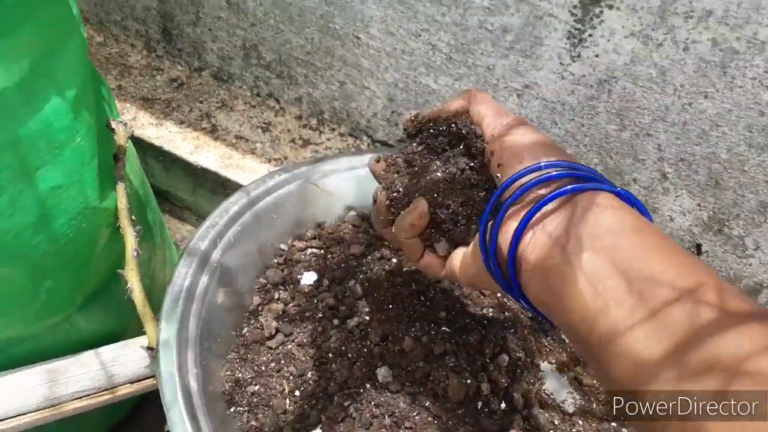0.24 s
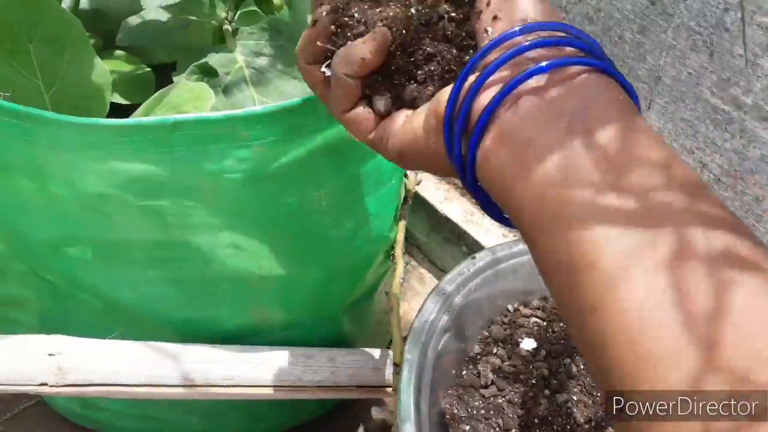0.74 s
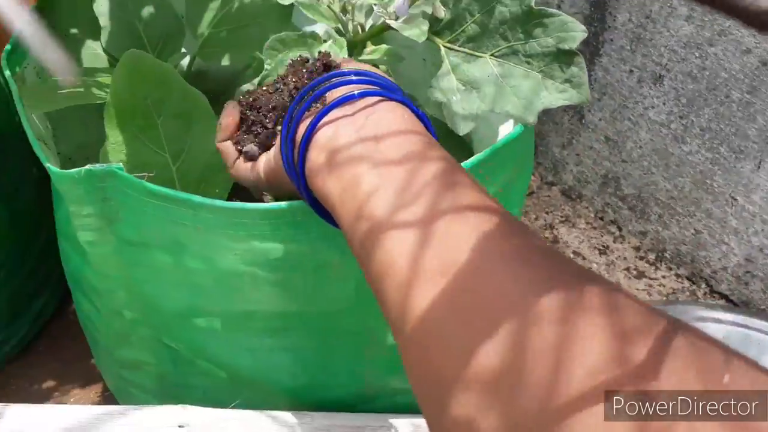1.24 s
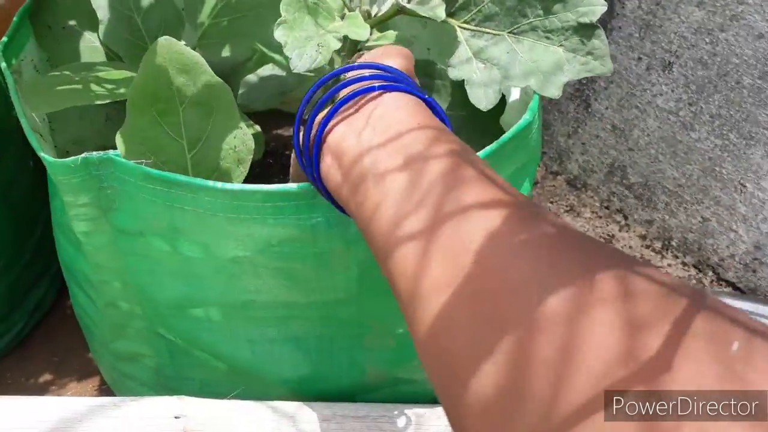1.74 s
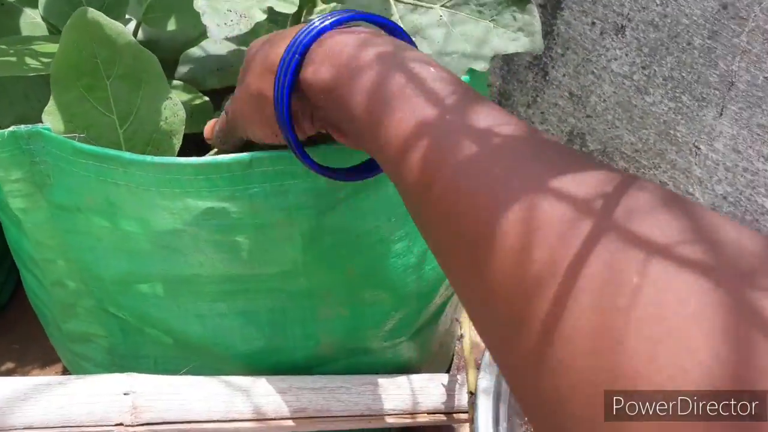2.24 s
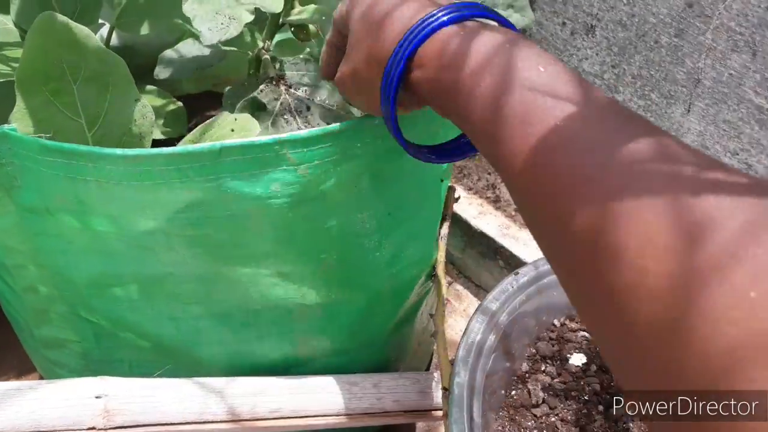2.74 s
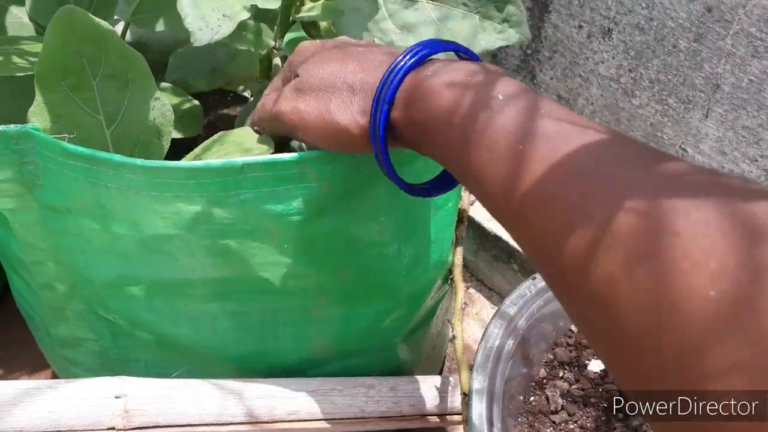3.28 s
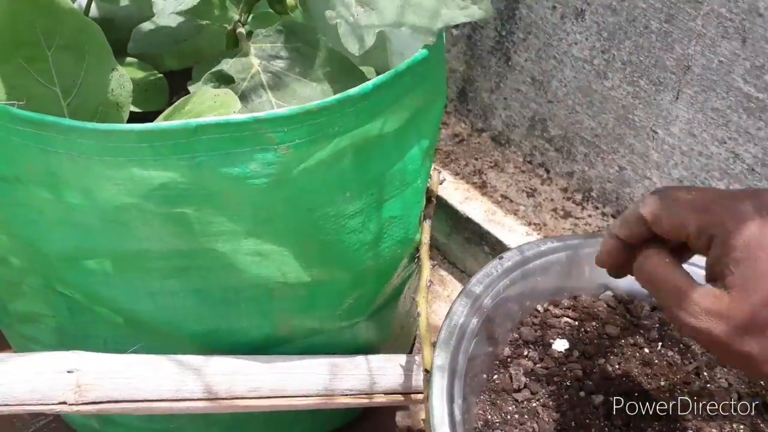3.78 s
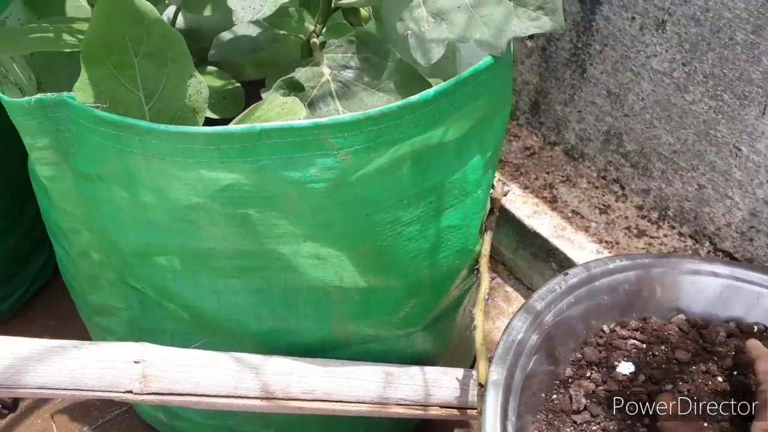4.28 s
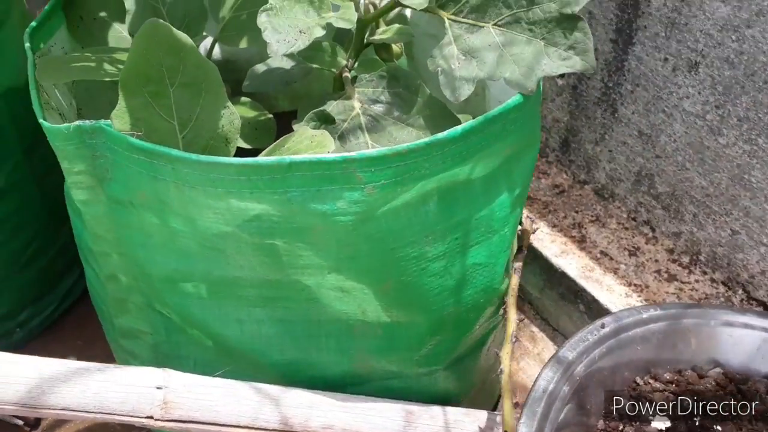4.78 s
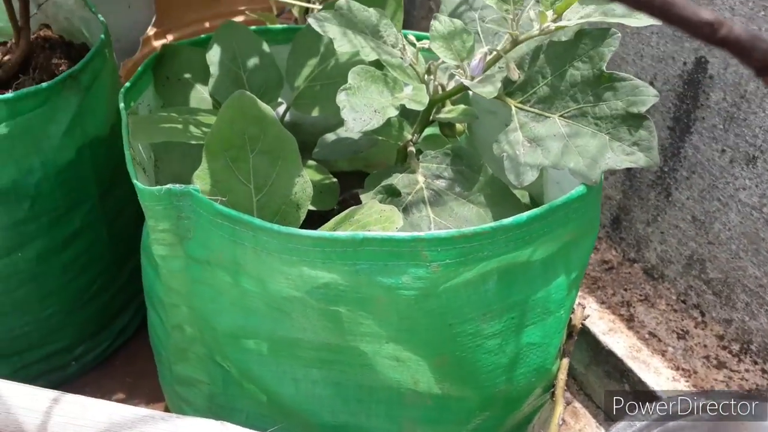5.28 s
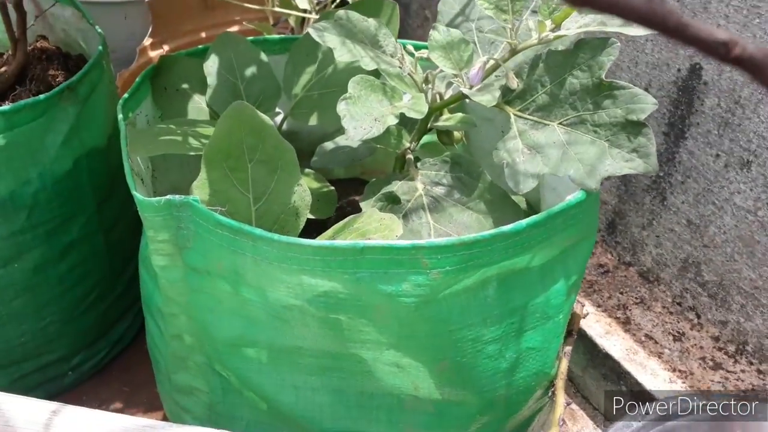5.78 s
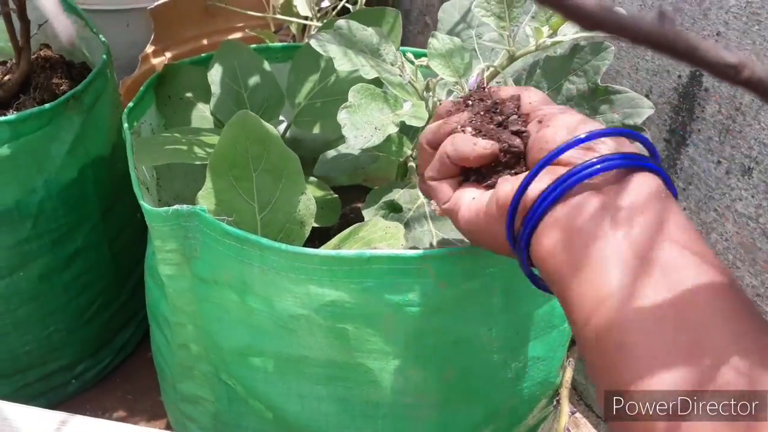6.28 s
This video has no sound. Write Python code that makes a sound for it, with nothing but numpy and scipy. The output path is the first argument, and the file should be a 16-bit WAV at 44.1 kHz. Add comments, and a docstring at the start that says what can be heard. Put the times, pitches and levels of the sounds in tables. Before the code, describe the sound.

Outdoors, very close to a phone microphone, a hand scrapes crumbly soil while a tiny metal trinket tinkles. Leaves and cloth rustle, crumbs crack and glass bangles clink brightly. After a quieter moment, a steel bowl gets one loud, short clank and some soft brushing. Wind then bumps the microphone, with a lighter second knock over faint distant traffic.

```python
"""Bangled hand feeding a potted plant

Outdoors, close to a phone's microphone: a hand in glass bangles carries crumbly fertilizer from a steel bowl to a
woven plant bag. Far traffic and air are shaped noise; near the end gusts buffet the microphone as lumps of low noise.
The bowl, knocked twice and brushed, the bangles and a small metal trinket ring as damped modes.
Nearest are leaves, cloth and soil: patchy noise and tiny clicks, with bursts for cracking crumbs and scrapes.
"""
import sys
import numpy as np
from scipy import signal
from scipy.fft import rfft, irfft, next_fast_len
from scipy.io import wavfile
from scipy.ndimage import uniform_filter1d, map_coordinates

SR = 44100
rng = np.random.default_rng(int(sys.argv[2]) if len(sys.argv) > 2 else 0)


def bounce(signal):
    """Save signal as a 16-bit WAV file at the path given by the first command-line argument."""
    frames = np.transpose(np.atleast_2d(signal))
    limited = np.clip(frames, -1, 1)
    pcm = np.round(limited * 32767).astype(np.int16)
    wavfile.write(sys.argv[1], SR, pcm)


N = 287664  # length in samples
TOP_HZ, NOISE_TOP_HZ = 16800, 15700  # upper limits of the phone, and of the noise-like layers


def amp(db):
    """Decibels to amplitude."""
    return 10 ** (np.asarray(db) / 20)


def unit(x):
    """Scales a sound to rms 1."""
    return x / np.sqrt(np.mean(x ** 2) + 1e-20)


def along(points, hz):
    """Reads (pitch_hz, value) points on a logarithmic pitch axis."""
    f, v = np.transpose(points)
    return np.interp(np.log(hz + 1), np.log(f + 1), v)


def curves(rows):
    """One value per sample for each column after the time."""
    s, *cols = np.transpose(rows)
    return [np.interp(np.arange(N) / SR, s, c) for c in cols]


def wobble(rate):
    """A smooth random curve with rate knots a second."""
    knots = rng.standard_normal(int(N * rate / SR) + 4)
    return map_coordinates(knots, [np.arange(N) * rate / SR])


def filtered(x, response):
    """Multiplies the spectrum of x by a response of frequency."""
    m = next_fast_len(len(x) + 8192)
    return irfft(rfft(x, m) * response(np.fft.rfftfreq(m, 1 / SR)), m)[:len(x)]


def noise(spectrum, patchy_db=0, count=N, size=256):
    """Coloured noise of rms 1, uneven in time and frequency; a larger size makes patches narrower and longer."""
    z = signal.stft(rng.standard_normal(count), nperseg=size)[2]
    field = uniform_filter1d(rng.standard_normal(z.shape), 5, 0)
    field = uniform_filter1d(field, 5, 1)
    white = signal.istft(z * amp(patchy_db * unit(field)), nperseg=size)[1][:count]
    return unit(filtered(white, lambda hz: amp(along(spectrum, hz))))


def add(track, s, sound):
    """Mixes a sound into the track from time s."""
    room = track[round(s * SR):][:len(sound)]
    room += sound[:len(room)]


def swell(t60, rise):
    """A quick rise and an exponential fall, top 1; t60 and rise in seconds."""
    t = np.arange(SR // 4) / SR
    shape = (1 - np.exp(-t / max(rise, 1e-4))) * amp(-60 * t / max(t60, .005))
    return shape / shape.max()


# Strength of the far traffic: time_s [s], level_db [dB]
TRAFFIC_LEVEL = [(0.0, -66.5), (1.16, -69), (1.69, -64.5), (3.34, -58), (4.19, -67.5), (5.56, -59),
                 (5.99, -62), (6.25, -60.5), (6.37, -68), (6.52, -64)]
# Colour of the far traffic: pitch_hz [Hz], density_db [relative dB per Hz]
TRAFFIC_COLOUR = [(15, -56), (25, -28.5), (70, -4.5), (98, 3.5), (150, 1), (200, -16.5), (260, -11.5),
                  (340, -28.5), (570, -120)]
# Colour of the faint air noise: pitch_hz [Hz], density_db [relative dB per Hz]
AIR_COLOUR = [(120, -36.5), (200, -6), (321, 1.5), (472, -6.5), (997, -14.5), (1380, -17.5), (2580, -10),
              (8140, -12), (10500, -16), (14900, -16), (15700, -14)]


def outdoors():
    """Low noise of far traffic wavers over a faint, steady, wideband air noise."""
    air = filtered(noise(AIR_COLOUR, patchy_db=1.5), lambda hz: hz < NOISE_TOP_HZ)
    waver_db = 2 * wobble(37)
    traffic = amp(curves(TRAFFIC_LEVEL)[0] + waver_db) * noise(TRAFFIC_COLOUR)
    return traffic + amp(-74.0) * air


# Puffs of wind on the microphone: start_s [s], level_db [dB at the top]
PUFFS = [(5.547, -37), (5.631, -47), (5.709, -63), (5.788, -51), (5.86, -53.5), (5.968, -47.5),
         (6.167, -40.5), (6.292, -38.5), (6.365, -38.5), (6.416, -42.5), (6.493, -41.5)]
# Strength of a soft narrow swish: time_s [s], level_db [dB]
SWISH_LEVEL = [(6.33, -82.5), (6.396, -62.5), (6.52, -55)]


def wind():
    """Each puff is a quickly rising, slowly fading lump of low noise; one swish is narrow-band noise."""
    puffs = np.zeros(N)
    for s, db in PUFFS:
        add(puffs, s, amp(db) * swell(t60=0.12, rise=0.0062))
    started = np.arange(N) > SWISH_LEVEL[0][0] * SR
    swish = amp(curves(SWISH_LEVEL)[0]) * started
    # both colours: Hz, relative dB per Hz
    low = noise([(25, -27.5), (60, 8.5), (150, 3.0), (320, -12), (600, -53.5), (900, -84)])
    narrow = noise([(800, -69), (1150, -11), (1450, 5), (1800, -3.5), (2500, -57.5)])
    return puffs * low + swish * narrow


# Contacts of hand and bowl, several to a knock:
# start_s [s], level_db [dB], bass_db [dB relative to level], tilt_db [dB per octave above 1 kHz]
KNOCKS = [(4.722, -17.5, -10, 0), (4.728, -1, -25, -12), (4.7319, -3, -32, 10), (4.7462, -21, -12, -7),
          (6.074, -8.5, -66.5, 2), (6.078, -12.5, -58.5, -5)]
# Modes of the steel bowl: pitch_hz [Hz], level_db [relative dB], t60_s [s when left to ring after a knock]
BOWL_MODES = [(429, -14, 0.11), (871, -7.5, 0.094), (1044, -11, 0.12), (1878, -11, 0.089), (2300, -3, 0.12),
              (2664, -3.5, 0.11), (2940, 1, 0.1), (3960, 2.5, 0.09), (4540, -11.5, 0.043)]
# Colour of the knock's clatter: pitch_hz [Hz], density_db [relative dB per Hz]
CLATTER_COLOUR = [(290, -35), (500, -32), (1010, -14.5), (1820, -17.5), (2840, 0.5), (4500, 1), (5050, 2.5),
                  (8600, -8.5), (15500, -45.5)]
# Dying of yard and bowl after a knock: pitch_hz [Hz], t60_s [s]
CLATTER_DECAY = [(500, 0.15), (2000, 0.097), (6000, 0.05), (15000, 0.055)]


def knocked_bowl():
    """A knock excites damped steel modes, a clatter of crumbs dying band by band and a low thud."""
    out, t = np.zeros(N), np.arange(SR // 4) / SR
    for s, db, bass_db, tilt in KNOCKS:
        ring = np.zeros(len(t))
        for hz, level, t60 in BOWL_MODES:
            decay = amp(level + rng.normal(0, 3) - 60 * t / t60)
            ring += decay * np.sin(2 * np.pi * hz * t + rng.uniform(0, 2 * np.pi))
        hz, when, z = signal.stft(rng.standard_normal(len(t)), SR, nperseg=128)
        colour_db = along(CLATTER_COLOUR, hz) + tilt * np.log2(np.maximum(hz, 1000) / 1000)
        fall_db = 60 * when / along(CLATTER_DECAY, hz)[:, None]
        z = z * amp(colour_db[:, None] - fall_db)
        clatter = signal.istft(z, SR, nperseg=128)[1][:len(t)]
        clatter = clatter / np.std(clatter[:SR // 200])  # level set by its first 5 ms
        thud = 1.3 * np.sin(2 * np.pi * 150 * t) + 1.3 * np.sin(2 * np.pi * 250 * t)
        thud = amp(bass_db - 60 * t / 0.1) * thud
        onset = 1 - np.exp(-t / 0.00056)
        add(out, s, amp(db) * onset * (amp(-21.5) * ring + amp(-11.0) * clatter + thud))
    return filtered(out, lambda hz: (hz < NOISE_TOP_HZ) / (1 + (105 / (hz + 1)) ** 4))


# Fingers and crumbs brushing the bowl: middle_s [s], level_db [dB], length_s [s]
BRUSHES = [(3.73, -64, 0.05334), (3.783, -56.5, 0.029), (3.875, -73, 0.048), (4.391, -67.5, 0.32),
           (4.852, -44, 0.068), (5.046, -52.5, 0.073), (5.528, -55, 0.051), (5.568, -47.5, 0.049),
           (5.686, -62, 0.042)]
BRUSH_DULL_HZ, BRUSH_DAMPING = 1310, 4.1  # soft contact reaches mainly low modes; the hand widens them (factor)


def brushed_bowl():
    """Uneven soft contact keeps the low modes of the bowl humming, as noise through damped resonances."""
    t = np.arange(N) / SR
    touch = np.zeros(N)
    for s, db, length in BRUSHES:
        touch += amp(db) * np.exp(-(2.5 * (t - s) / length) ** 2)

    def modes(f):
        """Sum of the hand-damped resonances, dulled by the soft contact."""
        total = 0
        for hz, db, t60 in BOWL_MODES:
            damping = 1j * f * BRUSH_DAMPING / t60
            total = total + amp(db) * damping * 2.2 / (hz * hz - f * f + damping * 3.1)
        return total / (1 + (f / BRUSH_DULL_HZ) ** 4)

    unevenness = amp(5.06 * wobble(60))
    return touch * unevenness * unit(filtered(rng.standard_normal(N), modes))


CHATTER, CHATTER_S = .7, .005  # phase roughness of loose contact (radians) and its fading time (s)


def ringing(taps, groups, tick_db, brush_db):
    """Each tap rings groups of modes until skin damps them; loose contact roughens each, a noise tick marks it."""
    out, ticks, t = np.zeros(N), np.zeros(N), np.arange(SR // 5) / SR
    for s, free, *strengths in taps:
        skin = np.exp(-(t / free) ** 3)
        onset = 1 - np.exp(-t / 0.00056)
        for db, modes in zip(strengths, groups):
            for hz, level, t60 in modes:
                luck_db, detune = rng.standard_normal(2) * [2, .003]
                brushing_db = brush_db * map_coordinates(rng.standard_normal(100), [t * 200])
                rattle = map_coordinates(rng.standard_normal(400), [t * 1900])
                chatter = CHATTER * np.exp(-t / CHATTER_S) * rattle
                tone = np.sin(2 * np.pi * hz * (1 + detune) * t + chatter)
                decay = amp(db + level + luck_db + brushing_db - 60 * t / t60)
                add(out, s, decay * tone * onset * skin)
        tick = amp(max(strengths) + tick_db - 60 * t / 0.022) * rng.standard_normal(len(t))
        add(ticks, s, tick)
    return out + filtered(ticks, lambda hz: (hz > 4500) * amp(-24 * (hz > NOISE_TOP_HZ)))


# Trinket taps: start_s [s], free_s [s of ringing before the skin damps it],
# low_db, middle_db, high_db, top_db [dB for each group of modes]
TRINKET_TAPS = [(.163, 0.03, -51, -29.5, -32, -41), (.1774, 0.047, -42, -40, -38, -51.5),
                (.198, 0.025, -35, -31.5, -35, -44), (.2134, 0.054, -35, -47.5, -45, -25),
                (.2503, 0.03, -41, -36, -30.5, -52), (.2848, 0.0221, -45, -50, -43, -52),
                (.3644, 0.034, -55, -60, -60, -73)]
# Trinket modes in low, middle, high and top groups: pitch_hz [Hz], level_db [relative dB], t60_s [s undamped]
TRINKET_MODES = [
    [(5140, -8.5, 0.11), (6400, -6, 0.17), (6950, -1, 0.24)],
    [(9090, -0.5, 0.11)],
    [(11520, 1, 0.1)],
    [(13680, -3, 0.0533)],
]


def trinket():
    """A small metal trinket tinkles: each tap spreads its strength differently over four groups of modes."""
    return ringing(TRINKET_TAPS, TRINKET_MODES, tick_db=-10.5, brush_db=3.5)


# Bangle clinks: start_s [s], free_s [s of ringing before the skin damps it],
# first_db, second_db, third_db [dB for each bangle]
BANGLE_CLINKS = [(1.408, 0.0054, -60, -45, -62), (1.4247, 0.028, -61, -42.5, -58),
                 (2.1066, 0.019, -50.5, -44.5, -49), (2.3225, 0.0276, -51, -38.5, -50.5),
                 (3.0333, .012, -63, -43, -44), (3.172, .025, -59, -39, -55.5),
                 (3.3563, 0.029, -43, -24.5, -29), (3.3644, .027, -36, -36, -27),
                 (3.433, 0.045, -60, -34, -60), (3.465, 0.017, -54, -43, -41),
                 (3.4984, .04, -45, -22.5, -28), (3.5144, 0.022, -27, -28.5, -34),
                 (3.589, 0.014, -56, -44, -55), (3.639, 0.011, -43, -31, -66),
                 (4.0844, 0.058, -74, -35.5, -57), (4.1124, 0.01355, -65, -50, -61.5),
                 (4.9033, 0.0077, -56, -47, -62), (5.1864, 0.043, -49, -41.5, -50),
                 (5.329, 0.015, -63, -50, -71.5), (5.3784, 0.02, -45, -34, -47)]
# Modes of each of the three glass bangles: pitch_hz [Hz], level_db [relative dB], t60_s [s undamped]
BANGLE_MODES = [
    [(9140, 1, 0.094)],
    [(5080, -20.5, 0.07), (5400, -17.5, 0.07), (9800, -2.5, 0.047), (10180, -0.5, 0.065),
     (11030, -10.5, 0.033)],
    [(14670, 4, 0.072), (15300, -6.5, .02)],
]


def bangles():
    """Three glass bangles clink on the wrist, each ringing at its own strength."""
    return ringing(BANGLE_CLINKS, BANGLE_MODES, tick_db=-15, brush_db=3.0)


def grains(count, centre_hz, cycles, spread_db):
    """Tiny damped clicks at random moments, each with its own pitch and size; rms 1."""
    at, u = rng.random(count), rng.standard_normal(count)
    size = np.minimum(rng.exponential(size=count), 4)
    hz = np.clip(centre_hz * np.exp(.6 * u), 300, 12000)[:, None]
    k = np.arange(512)
    clicks = np.sin(2 * np.pi * hz * k / SR) * np.exp(-k * hz / (cycles * SR))
    clicks = amp(spread_db * size)[:, None] * clicks
    places = (at * N).astype(int)[:, None] + k
    return unit(np.bincount(places.ravel(), clicks.ravel(), N + 512)[:N])


# Strength of the rubbing of hand, leaves and soil: time_s [s], crackle_db [dB], body_db [dB of the dull part]
RUSTLE_LEVEL = [(0, -59, -78), (.16, -53, -54.5), (.29, -63.5, -69), (.6, -69, -81.5), (.83, -63.5, -82),
                (.95, -106, -80), (1.33, -65.5, -76.5), (1.42, -56.5, -71), (1.56, -59, -62.5),
                (1.94, -56.5, -64.5), (2.12, -54.5, -65), (2.28, -64.5, -65.5), (2.4, -50.5, -58),
                (2.53, -47.5, -51), (2.7, -54, -58), (2.77, -59.5, -71.5), (3.0, -51.5, -62),
                (3.41, -54.5, -56.5), (3.6, -54, -57), (3.66, -67, -72), (3.86, -69, -71),
                (3.93, -80, -75.5), (4.24, -83.5, -87), (4.3, -58.5, -58), (4.46, -60, -55),
                (4.52, -83.5, -89), (4.68, -51.5, -53.5), (4.85, -50.5, -46), (4.9, -69.5, -61.5),
                (5.1, -59.5, -54), (5.27, -57.5, -62), (5.33, -66.5, -67.5), (5.5, -69.5, -72),
                (5.62, -67, -58.5), (5.77, -75, -68.5), (6.1, -63.5, -75.5), (6.39, -68.5, -69),
                (6.52, -55.5, -71)]
# Colour of the dull body of the rubbing: pitch_hz [Hz], density_db [relative dB per Hz]
BODY_COLOUR = [(110, -31), (180, 2.5), (232, -2), (403, 4), (573, -7.5), (1020, -1), (1320, -9),
               (2000, -12), (2600, -27), (4400, -120)]
# Colour of the crackle: pitch_hz [Hz], density_db [relative dB per Hz]
CRACKLE_COLOUR = [(1300, -30), (1700, -7), (2900, -5.5), (4900, -2), (7000, -4), (8800, -2), (9400, -17.5),
                  (11000, -34)]
# Colour of the high hiss: pitch_hz [Hz], density_db [relative dB per Hz]
HISS_COLOUR = [(8000, -37.5), (9200, -4.5), (15600, -10.5)]
PATCHY_DB = 2.5  # unevenness of crackle and body noise
BED_HISS_DB = -8.5  # hiss of the bed, relative to its crackle
# soft rubbing is thinner: dB lost below that pitch per dB under full strength
SOFT_THINNING, FULL_DB, THIN_BELOW_HZ = 0.74, -51.5, 3800


def rubbing():
    """Rubbing is a patchy bed of body, crackle and hiss noise sprinkled with grains; uneven contact flutters it."""
    crackle_db, body_db = curves(RUSTLE_LEVEL)
    flutter = 1.3 * wobble(20) + 0.53 * wobble(70) + 0.4 * wobble(280)  # dB, shared by the whole bed
    crackle = noise(CRACKLE_COLOUR, patchy_db=PATCHY_DB, size=512)
    crackle = crackle + 0.84 * grains(count=12000, centre_hz=4617, cycles=5.1, spread_db=4.5)
    thinning = amp(SOFT_THINNING * np.minimum(crackle_db - FULL_DB, 0))
    lower = filtered(crackle, lambda hz: 1 / (1 + (hz / THIN_BELOW_HZ) ** 8))
    crackle = crackle + (thinning - 1) * lower
    body = noise(BODY_COLOUR, patchy_db=PATCHY_DB, size=1024)
    body = body + 0.48 * grains(count=1500, centre_hz=830, cycles=2.1, spread_db=5.5)
    hiss = noise(HISS_COLOUR, patchy_db=2.2)
    return (amp(body_db + flutter) * body + amp(crackle_db + flutter) * crackle
            + amp(crackle_db + BED_HISS_DB + flutter) * hiss)


GRIT = 0.35  # share of sharp grains in the crackle of a crack or scrape


def burst(db, body_db, hiss_db, peak_hz, shape):
    """One crack or scrape: body and gritty crackle share a strongest pitch, with hiss; the body fades slowest."""
    count = len(shape)
    spot = lambda hz: 1 + 2.6 * np.exp(-np.log((hz + 1) / peak_hz) ** 2 / 0.44)
    crackle = unit(filtered(noise(CRACKLE_COLOUR, PATCHY_DB, count=count), spot))
    grit = rng.exponential(size=count // 40 + 1) ** 2 / 2  # a new grain about every millisecond
    grit = np.repeat(grit, 40)[:count] ** .5
    crackle = crackle * unit(1 - GRIT + GRIT * grit)
    body = amp(body_db) * unit(filtered(noise(BODY_COLOUR, 0.35, count=count), spot))
    hiss = amp(hiss_db) * noise(HISS_COLOUR, 1.5, count=count)
    return amp(db) * (body * shape ** 0.8 + crackle * shape + hiss * shape ** 0.88)


# Scrapes that swell and fade:
# middle_s [s], level_db [dB], body_db [dB relative to crackle], length_s [s], pitch_hz [Hz, strongest]
SCRAPES = [(0.127, -32, -18.5, 0.072, 4830), (0.143, -31.5, -10.5, 0.027, 3900),
           (0.235, -47.5, -7.5, 0.066, 3460), (0.432, -76, 0, 0.097, 1100),
           (1.429, -53.5, -0.5, 0.13, 3660), (1.698, -53.5, 0, 0.066, 1780),
           (1.801, -53.5, 7.5, 0.03, 579.6), (2.05, -55, -5, 0.065, 3480), (2.117, -62.5, 8, 0.051, 1100),
           (2.346, -45.5, -15.5, 0.05, 4150), (2.447, -43, 1, 0.046, 1540), (2.543, -54, 3.5, 0.11, 3020),
           (2.637, -42.5, -19, 0.096, 4400), (2.854, -50, -7.5, 0.17, 4240),
           (2.962, -45, -6.5, 0.065, 1280), (3.043, -54, 2.5, 0.2, 4500), (3.223, -36, -11, 0.033, 4600),
           (3.394, -43.5, 0, 0.043, 4530), (3.505, -41, -7, 0.056, 4240), (3.554, -47.5, -1, 0.031, 4470),
           (3.777, -64, 1.5, 0.067, 1860), (4.362, -63, -11, 0.27, 4525), (4.426, -55, -0.5, 0.17, 5300),
           (4.706, -35.5, -7.5, 0.018, 4500), (4.724, -33, -3.5, 0.022, 3000),
           (5.121, -49.5, -29, 0.19, 6380), (5.514, -56.5, -1.5, 0.046, 790),
           (6.069, -49.5, -15.5, 0.031, 5010), (6.468, -54, -6.5, 0.082, 5954)]


def scrapes():
    """A scrape swells and fades symmetrically, roughened by stick and slip about every 2 ms."""
    out = np.zeros(N)
    t = np.arange(SR // 5) / SR - .1
    for s, db, body_db, length, hz in SCRAPES:
        rough = amp(0.97 * np.repeat(rng.standard_normal(len(t) // 90), 90))
        shape = rough * np.exp(-(2.54 * t / length) ** 4)
        add(out, s + t[0], burst(db, body_db, hiss_db=-6.5, peak_hz=hz, shape=shape))
    return out


# Cracking crumbs and leaf flicks: start_s [s], peak_db [dB, nominal], body_db, hiss_db [dB relative to crackle],
# t60_s [s, floored at 5 ms], pitch_hz [Hz, strongest]
CRUMBS = [(0.056, -31.5, -21, -19, 0.045, 5192), (0.0828, -38.5, -9, 1.5, 0.043, 5100),
          (0.335, -56, -35, -3, 0.026, 6500), (0.42, -52, -25, 1, 0.03, 8000),
          (0.503, -51, -30, -8, 0.035, 8500), (0.389, -44.5, -36, -1, 0.03, 8950),
          (0.5643, -46, -37, -4, 0.042, 7700), (0.6949, -48.5, -25, 2, 0.062, 8320),
          (0.7199, -28, -26, -25, 0.11, 5030), (0.7379, -36.5, -22, -10, 0.083, 3000),
          (0.7729, -29.5, -29, 0, 0.046, 8040), (0.987, -48.5, -41, -1, 0.025, 8150),
          (1.035, -43.5, -30, -17.5, 0.091, 8060), (1.0803, -48, -26, -21.5, 0.087, 7600),
          (1.222, -55, -4, -22, 0.027, 2500), (1.4096, -37, 1, -4.5, 0.037, 740),
          (1.793, -28.5, -2, -4.5, 0.066, 605), (1.844, -31, -44, -2, 0.05, 8460),
          (2.219, -47, -20, -23, 0.021, 4770), (2.4197, -26.5, -9, -29, 0.079, 2800),
          (2.4422, -38, 5, -27, 0.057, 1120), (2.261, -51.5, 9, -24, 0.03, 1500),
          (2.288, -45, -15, 1, 0.05, 7000), (2.456, -26, 1, -21, 0.038, 2000),
          (2.48, -25.5, -1, -28, 0.042, 2430), (2.4999, -40, 7, -20, 0.028, 530),
          (2.585, -32.5, -20, -11, 0.03, 7000), (2.625, -23, -23, -14, 0.04, 6670),
          (2.6471, -27.5, -5, -20, 0.06, 1920), (2.774, -34, -31, -8, 0.032, 4300),
          (2.816, -31.5, -12, -2, 0.035, 4150), (2.801, -38, -22, -19, 0.03, 5020),
          (2.846, -34.5, -15, -14, 0.04, 3500), (2.871, -32.5, -22, -17.5, 0.02785, 5500),
          (2.9055, -35.5, -8, -6.5, 0.1, 1950), (2.981, -31, -21, -13.5, 0.024, 5060),
          (3.148, -37.5, -3, -12, 0.028, 2000), (3.189, -31.5, -11, -20.5, 0.05, 2970),
          (3.283, -30, -24, -5.5, 0.11, 7000), (3.291, -25.5, -10.5, -20.5, 0.051, 2740),
          (3.371, -22.5, -32, -6, 0.077, 8210), (3.488, -32, -15, -4.5, 0.058, 5170),
          (3.7045, -49.5, -24, -14, 0.032, 942), (3.9625, -51, -44, -13, 0.15, 7470),
          (4.2649, -35, -8, -7.5, 0.1, 3140), (4.2727, -30, -30.5, -8, 0.042, 6350),
          (4.6218, -40.5, -5, -17.5, 0.051, 764), (4.653, -37, 2.5, -18.5, 0.32, 950),
          (4.833, -36, 0, -21, 0.049, 5650), (4.8452, -32, 1.5, -20, 0.14, 767),
          (4.9228, -39, 0, -19, 0.077, 1320), (5.246, -38, -5, -14.5, 0.091, 2327),
          (5.2729, -35.5, 1, -12.5, 0.049, 866), (5.5489, -37, 0.5, -7, 0.06669, 806),
          (5.5603, -32.5, -1.5, -12, 0.089, 920), (5.618, -36, -4, -7, 0.088, 3340),
          (5.877, -52, -29, 4, 0.091, 8480), (5.905, -40.5, -31, -7.5, 0.068, 6400),
          (6.115, -40.5, -28, -14, 0.03, 6840), (6.1508, -41, -5.5, -6.5, 0.1066, 8440),
          (6.186, -37, -19, -12, 0.073, 5500), (6.267, -33.5, -39, -13.5, 0.025, 8560),
          (6.298, -29.5, -30.5, -5, 0.032, 3900), (6.333, -46, -21, -16, 0.052, 6690)]
CRUMB_CREST_DB = 11  # nominal peak over rms
SNAP, SNAP_T60_S = 0.5, 0.012  # share and decay of the sharp head of a crack


def crumb_cracks():
    """A crumb cracks or a leaf flicks: a noise burst with a sharp snap at its head and a longer fall."""
    out = np.zeros(N)
    for s, db, body_db, hiss_db, t60, hz in CRUMBS:
        shape = swell(t60, rise=0.00028) + SNAP * swell(SNAP_T60_S, rise=0.00012)
        add(out, s, burst(db - CRUMB_CREST_DB, body_db, hiss_db, hz, shape))
    return out


def rustle():
    """Rubbing leaves, cloth and soil, with single scrapes and cracks over it."""
    return filtered(rubbing() + scrapes() + crumb_cracks(), lambda hz: hz < NOISE_TOP_HZ)


def scene():
    """Sums the layers from the far yard to the hand close to the microphone."""
    background = outdoors() + wind()
    metal_and_glass = knocked_bowl() + brushed_bowl() + trinket() + bangles()
    return (background + metal_and_glass + rustle())[None]


def record(dry):
    """The phone keeps nothing above its band limit."""
    return filtered(dry[0], lambda hz: hz < TOP_HZ)[None]


dry = scene()
out = record(dry)
bounce(out)
```